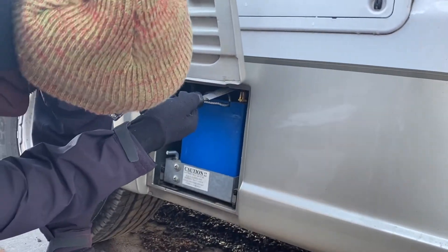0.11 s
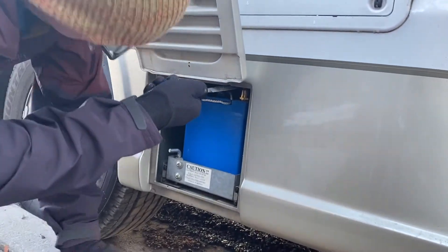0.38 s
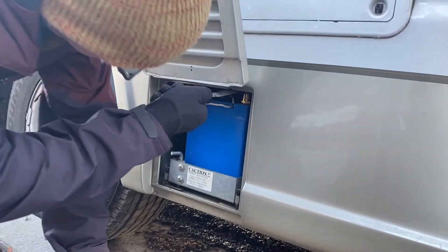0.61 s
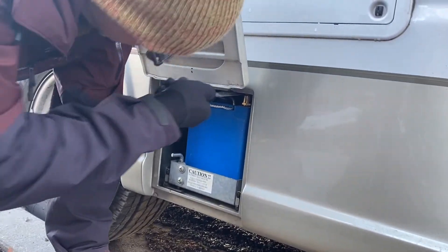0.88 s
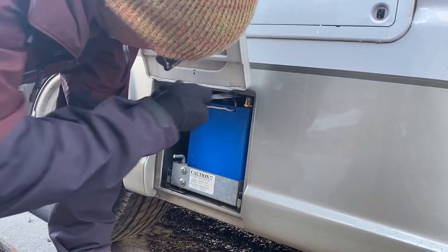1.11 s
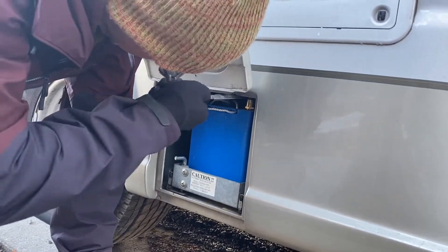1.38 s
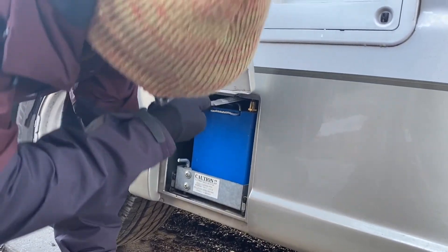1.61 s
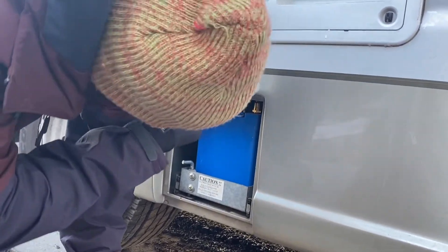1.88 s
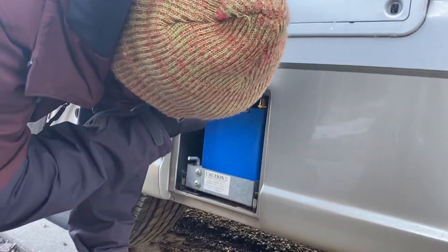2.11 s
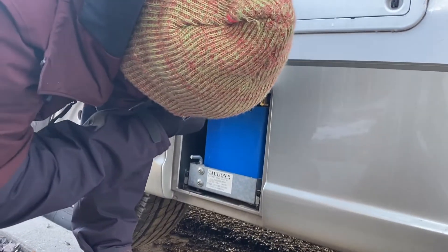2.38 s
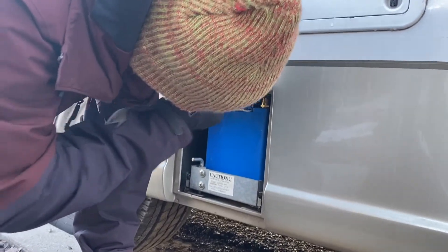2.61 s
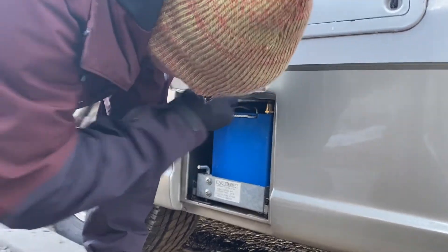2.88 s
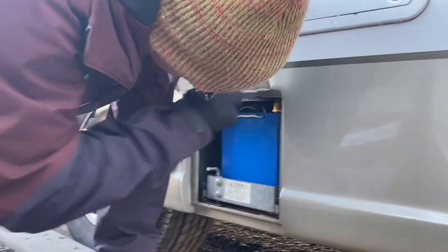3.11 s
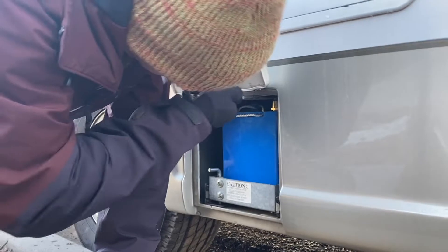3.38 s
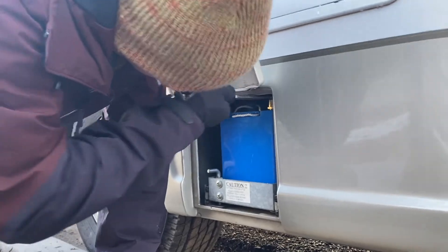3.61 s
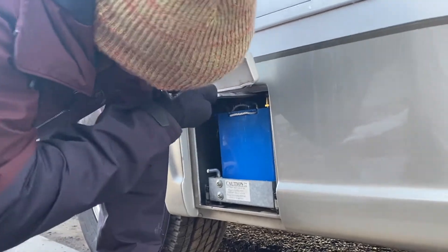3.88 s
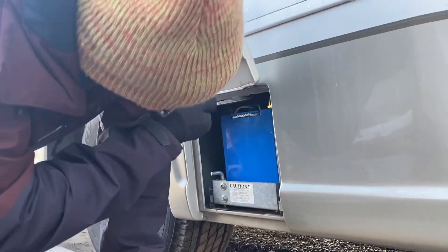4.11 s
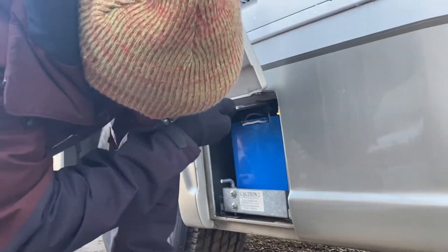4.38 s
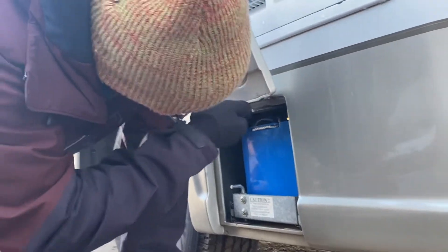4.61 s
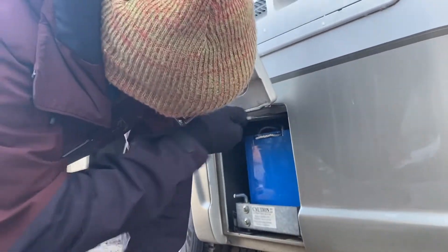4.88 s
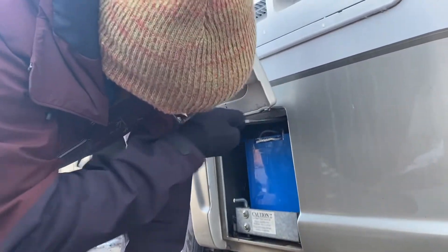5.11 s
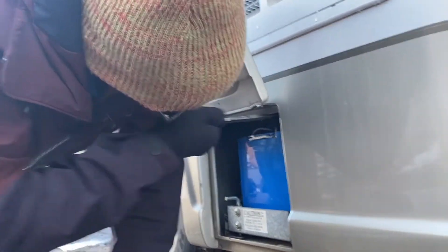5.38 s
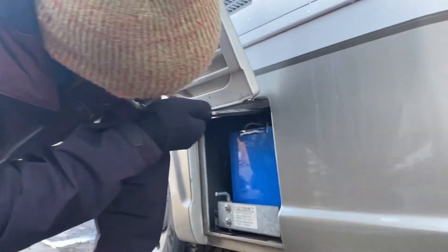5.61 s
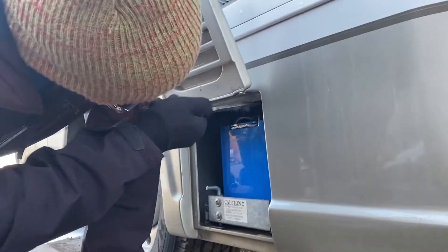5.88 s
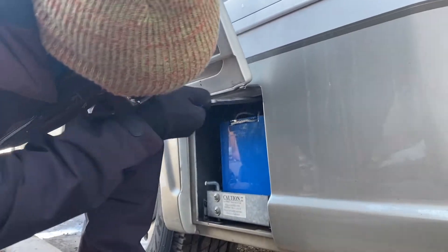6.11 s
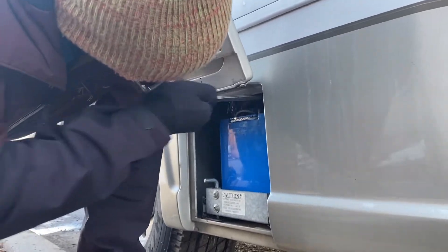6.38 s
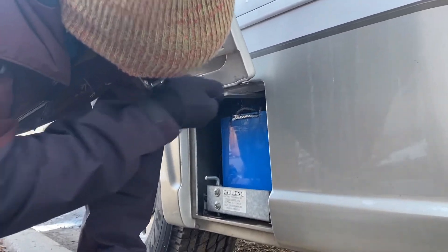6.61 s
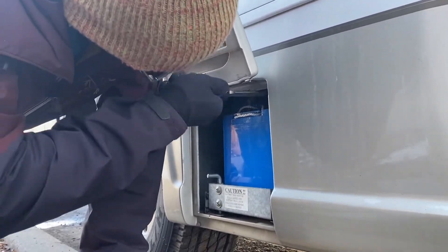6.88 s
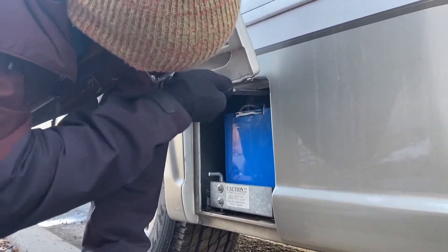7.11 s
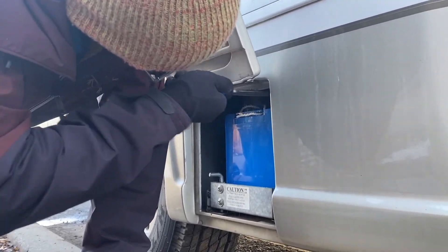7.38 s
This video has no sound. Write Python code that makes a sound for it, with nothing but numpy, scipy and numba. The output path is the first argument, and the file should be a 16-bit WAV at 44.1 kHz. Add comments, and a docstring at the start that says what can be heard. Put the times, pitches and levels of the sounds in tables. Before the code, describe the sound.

A hand file scrapes rapidly on a thin sheet-metal opening, close to a stereo handheld microphone in open air. Bright gritty hiss alternates between stronger and lighter strokes, over a hollow, rattling panel and low thumps. After a brief first run and a quieter gap, three steady runs follow, separated by short rests, while faint traffic and hum lie far behind.

```python
"""A hand file works a sheet-metal edge inside a vehicle's side compartment, outdoors, over traffic and hum.
Light touches lead into a first run of strokes: tooth clicks hiss and ring the file, coarser catches rattle
the thin panel's resonances, and gliding sines boom beneath. In the pause from 1.3 s come a few knocks, a
thin whistle of narrow noise near 2.1 s and a swell of band-limited tyre roar, which stays on at a lower level.
Filing returns at 2.4 s in three runs, parted by light strokes at 3.8 s and 5.5 s, with bursts as knocks."""
import sys
import numpy as np
from scipy import signal
from scipy.fft import rfft, irfft, next_fast_len
from scipy.io import wavfile
from numba import njit

SR = 44100
rng = np.random.default_rng(int(sys.argv[2]) if len(sys.argv) > 2 else 0)


def decibels_to_gain(level_db):
    """Convert a level in decibels to a linear amplitude gain (20 dB per decade)."""
    exponent = np.asarray(level_db, float) / 20
    return 10 ** exponent


def dump_mix(stems):
    """Bounce the given channels to the path in sys.argv[1] as a 16-bit WAV at rate SR."""
    frames = np.atleast_2d(stems).T  # one column per channel
    limited = np.clip(frames, -1, 1)  # hard clip at full scale
    pcm = np.round(limited * 32767).astype(np.int16)
    wavfile.write(sys.argv[1], SR, pcm)


N = 330309

# colour of the far traffic: f/Hz, relative level/dB
TRAFFIC_COLOUR = [(32, -25), (64, 5), (160, -13), (200, -14), (350, -22), (480, -26), (1550, -30),
                  (2100, -45.5), (12000, -52)]
# faint steady hum: f/Hz, level/dB
HUM_TONES = [(159, -46), (349.9, -54)]
# tyre roar of a far vehicle, end levels held: t/s, level/dB
PASSING_LEVEL = [(1.65, -69), (1.932, -69), (2.208, -54), (2.4, -60)]
# swells of the panel's lowest bending: centre t/s, level/dB before stereo balance, f/Hz at the centre
BOOM_SWELLS = [(0.6, -12.5, 160), (0.718, -18.5, 175.4), (0.861, -4.5, 165.6), (1.146, -6.5, 157.7),
               (1.576, -21.5, 159), (2.641, -4, 148.4), (2.762, -11.5, 177.3), (4.103, -13.5, 144),
               (4.292, -10, 138), (4.663, -10.5, 141), (5.357, -8, 146), (5.894, -10, 141),
               (6.045, -4, 184), (6.623, -7, 177.4), (6.85, -7.5, 179), (7.034, -4.5, 183),
               (7.075, -8, 180), (7.307, 1.5, 174)]
# file strokes, push and pull in turn:
# start t/s, length t/s, relative rasp level/dB, relative panel level/dB, hardest bite/share of stroke 0-1
FILE_STROKES = [(0.037, 0.046, -37, -34, 0), (0.143, 0.074, -35.5, -37, 0), (0.22, 0.77, -46.5, -57, 0),
                (0.543, 0.076, -33, -28.5, 0.2), (0.683, 0.079, -33.5, -18.5, 0.9),
                (0.809, 0.07, -13, -11.5, 0.83), (0.934, 0.1, -18, -13, 0.3),
                (1.056, 0.097, -13.5, -10.5, 0.7), (1.165, 0.11, -26, -12.5, 0.1),
                (1.279, 0.021, -21.5, -20.5, 0.3), (2.455, 0.042, -32, -28, 0.05),
                (2.548, 0.13, -19.5, -15.5, 0.7), (2.695, 0.09, -28.5, -11, 0.24),
                (2.806, 0.07, -16, -9.5, 0.53), (2.905, 0.11, -29.5, -14, 1),
                (3.028, 0.11, -19.5, -16, 0.34), (3.151, 0.091, -23, -11.5, 0.18),
                (3.258, 0.1, -14.5, -12.5, 0.85), (3.37, 0.11, -24.5, -13, 0.54),
                (3.493, 0.092, -14, -11.5, 0.74), (3.606, 0.097, -20, -14.5, 0.6),
                (3.728, 0.025, -21.5, -12.5, 0.4), (3.839, 0.16, -39, -41, 0),
                (4.057, 0.1, -31.5, -18.5, 1), (4.237, 0.075, -19.5, -12, 0.55),
                (4.32, 0.13, -37, -22, 0.2), (4.463, 0.11, -11, -14, 0.4), (4.581, 0.099, -19.5, -9.5, 0.8),
                (4.706, 0.12, -8, -12, 0.3), (4.833, 0.093, -22.5, -9.5, 0.47),
                (4.943, 0.091, -11.5, -13.5, 0.67), (5.051, 0.1, -22, -14, 0.67),
                (5.17, 0.11, -12, -11.5, 0.18), (5.285, 0.11, -20, -8, 0), (5.536, 0.12, -40, -40, 0),
                (5.851, 0.099, -13.5, -14.5, 0.9), (5.966, 0.11, -26, -13, 0.3),
                (6.09, 0.097, -10, -11, 0.17), (6.206, 0.098, -25.5, -11.5, 0.16),
                (6.323, 0.093, -16, -12, 0.38), (6.433, 0.088, -27.5, -13, 0.15),
                (6.537, 0.11, -15.5, -16.5, 0.46), (6.657, 0.087, -28, -10.5, 0.06),
                (6.766, 0.094, -16, -13.5, 0.3), (6.883, 0.081, -26, -9.5, 0.86),
                (6.992, 0.099, -14, -11.5, 0.64), (7.119, 0.093, -28, -8, 0.2),
                (7.236, 0.1, -16.5, -9.5, 0.84), (7.359, 0.085, -27, -8, 0.6),
                (7.47, 0.043, -27.5, -20.5, 0.37)]
# the file knocks on the edge: t/s, relative burst level/dB, treble relative to it level/dB
EDGE_KNOCKS = [(0.041, -27.5, -0.5), (0.068, -39, 7), (0.156, -36, 5), (0.182, -40, -18), (0.205, -28, 1),
               (0.283, -40, 6), (0.544, -27, 8.5), (0.594, -26.5, 9), (0.757, -15.5, 1.5),
               (0.879, -3.5, -38), (1.448, -21.5, -29), (1.56, -29, -18), (2.053, -48, -5),
               (2.443, -19.5, -33), (2.865, -3.5, -34), (3.686, -5, -14), (4.057, -9, -53),
               (4.205, -43, 10), (4.243, -17, 10.5), (4.265, -6.5, -27), (4.353, -16.5, -23),
               (4.946, -18, 13.5), (5.172, -18, 1), (5.411, -9.5, -24), (5.754, -9, -62),
               (5.877, -12.5, 10.5), (6.104, -12.5, 9), (6.168, -7, -9), (6.335, -20, 14.5),
               (6.549, -12, 6.5), (7.003, -16, 9.5), (7.161, -6, -32), (7.395, -5, -37)]
# panel resonances: f/Hz, relative level/dB
PANEL_MODES = [(140, 7), (175, 8.5), (250, -1), (345, 2), (520, -5), (640, -4.5), (735, -6.5), (975, -14.5),
               (1150, -14), (1400, -21), (1650, -24), (1930, -24.5), (2300, -25.5), (2900, -37)]
# file and edge resonances: f/Hz, relative level/dB
FILE_MODES = [(1830, -8), (3000, 1), (3530, -9), (4270, 2), (4500, -5)]
# colour of the tooth hiss: f/Hz, relative level/dB
RASP_COLOUR = [(1500, -3), (7400, -4), (8600, -6.5), (10500, -6), (12500, -4.5), (13300, -10), (15200, -16),
               (16300, -43)]


def rms_one(x):
    """Scale to rms 1."""
    return x / np.sqrt(np.mean(x ** 2) + 1e-20)


def coloured(x, spectrum):
    """Give x a spectrum of (Hz, dB) points, joined along log frequency; rms 1."""
    size = next_fast_len(N)
    hz, db = np.transpose(spectrum)
    log_hz = np.log(np.fft.rfftfreq(size, 1 / SR) + 1)
    gain = decibels_to_gain(np.interp(log_hz, np.log(hz), db))
    return rms_one(irfft(rfft(x, size) * gain, size)[..., :N])


def drift(rate_hz):
    """Slow chance of rms 1: noise through two equal one-pole low-passes."""
    r = np.exp(-2 * np.pi * rate_hz / SR)
    slow = signal.lfilter([1], [1, -2 * r, r * r], rng.standard_normal(N + SR))
    return rms_one(slow[SR:])  # the filter has settled by now


@njit
def moving(x, turn, r):
    """One resonance of pole radius r whose centre (radians per sample) moves."""
    out = np.zeros_like(x)
    for i in range(2, x.shape[1]):
        pull = 2 * r * np.cos(turn[i])
        for c in range(x.shape[0]):
            push = (1 - r * r) / 2 * (x[c, i] - x[c, i - 2])
            out[c, i] = push + pull * out[c, i - 1] - r * r * out[c, i - 2]
    return out


def resonate(x, modes, width_hz, widen, shift_db, wander):
    """Parallel resonances, wider upwards; strength and pitch shift as the contact point travels."""
    out = 0
    for k, (hz, db) in enumerate(modes):
        r = np.exp(-np.pi * (width_hz + widen * hz) / SR)
        drive = decibels_to_gain(db + shift_db * drift(5.5)) * x + 1e-18
        turn = 2 * np.pi * hz / SR * (1 + wander * drift(1.79))
        left, right = moving(drive, turn, r)
        # each mode reaches the two microphones with a lag of its own, in samples
        lag = round(rng.uniform(-1, 1) * min(SR / hz / 6, 5))
        out = out + (-1) ** k * np.array([left, np.roll(right, lag)])
    return out


def outdoors():
    """Far traffic as coloured noise, alike at both microphones only in the bass, and a faint steady hum."""
    traffic = coloured(rng.standard_normal((2, N)), TRAFFIC_COLOUR)
    mid, side = traffic * decibels_to_gain(1.5 * drift(1))
    side = signal.sosfilt(signal.butter(2, 250, "high", fs=SR, output="sos"), side)
    t = np.arange(N) / SR
    hum = sum(np.sqrt(2) * decibels_to_gain(db) * np.sin(2 * np.pi * hz * t) for hz, db in HUM_TONES)
    return decibels_to_gain(-34) * np.array([mid + 1.27 * side, mid - 0.94 * side]) + hum


def passing():
    """Tyre roar, a band of noise, swells, then recedes part of the way and holds."""
    s, db = np.transpose(PASSING_LEVEL)
    level = decibels_to_gain(np.interp(np.arange(N) / SR, s, db))
    band = signal.butter(2, (1120, 1850), "band", fs=SR, output="sos")
    roar = signal.sosfilt(band, rng.standard_normal((2, N)))
    return level * rms_one(roar + 0.7 * roar[::-1])  # partly shared left and right


def whistle():
    """Noise through two equal narrow resonances: a thin breathy line rises out of the background and fades."""
    centre_s, half_s, pitch_hz, width_hz, level_db = 2.06, 0.09, 3350, 90, -67
    r = np.exp(-np.pi * width_hz / SR)
    turn = np.full(N, 2 * np.pi * pitch_hz / SR)
    line = moving(moving(rng.standard_normal((2, N)), turn, r), turn, r)
    away = (np.arange(N) / SR - centre_s) / half_s
    return decibels_to_gain(level_db) * np.exp(-away ** 2) * rms_one(line)


def compartment(x):
    """The open metal compartment adds a short midrange tail, another at each microphone."""
    t = np.arange(SR // 4) / SR
    fading = rng.standard_normal((2, len(t))) * decibels_to_gain(-60 * t / 0.11)  # 60 dB down in 0.11 s
    tail = signal.lfilter([1, -1], [1, -1.65, .67], fading)
    mono = x.mean(axis=0)[None]
    return x + decibels_to_gain(-39) * signal.fftconvolve(mono, tail, axes=1)[:, :N]


def booms():
    """The lowest bending swells and sags slightly in pitch, ringing out slower than it rises."""
    rise_s, fall_s, sag_per_s = 0.0072, 0.0082, 1  # pitch falls by twice the sag
    out = np.zeros(N)
    phases = rng.random((len(BOOM_SWELLS), 1))  # in cycles
    for (centre, db, hz), phase in zip(BOOM_SWELLS, phases):
        first, last = max(int((centre - .1) * SR), 0), min(int((centre + 0.084) * SR), N)
        at = np.arange(first, last)
        t = at / SR - centre
        away = np.where(t < 0, -t / rise_s, t / fall_s)
        cycles = hz * t * (1 - sag_per_s * t) + phase
        out[at] += np.sqrt(2) * decibels_to_gain(db - 4.65 * away ** 0.72) * np.sin(2 * np.pi * cycles)
    return out * decibels_to_gain(np.array([[-.6], [.6]]))  # left, right dB


def pressure(column, centre, follows, rise_db, fall_db, power):
    """Each stroke swells from the hand's reversal to its peak and sinks towards the next reversal."""
    t, total = np.arange(N) / SR, np.zeros(N)
    for row in FILE_STROKES:
        start, length, db, bite = row[0], row[1], row[column], row[4]
        # the peak lies at a usual share of the stroke, drawn partly towards the bite
        peak = np.clip(centre + follows * (bite - .5), .05, .95)
        span = slice(max(int((start - length) * SR), 0), int((start + 2 * length) * SR))
        share = (t[span] - start) / length
        away = np.where(share < peak, (peak - share) / peak, (share - peak) / (1 - peak))
        drop_db = np.where(share < peak, rise_db, fall_db) * away ** power
        total[span] += decibels_to_gain(db - drop_db) ** 2
    return np.sqrt(total)


def teeth(per_s, spread_db, width):
    """Teeth catch the edge in clumps with uneven force; a share of it differs between left and right."""
    force = decibels_to_gain(spread_db * np.minimum(rng.exponential(1, (2, N)), 5))
    sizes = force * rng.choice([-1, 1], (2, N))
    clumps = decibels_to_gain(3 * drift(60))
    caught = rng.random((2, N)) < clumps * per_s / SR
    mid, side = rms_one(sizes * caught)
    return np.array([mid + width * side, mid - width * side]) / np.sqrt(1 + width ** 2)


def knocks(soft_s, bright, click):
    """A hard first click, then a short scraping burst with a tail as the file slides a little."""
    slide_s, slide_db = 0.066, -24.5
    out, t = np.zeros(N), np.arange(4000) / SR
    fade = np.exp(-t / soft_s) + decibels_to_gain(slide_db) * np.exp(-t / slide_s)
    for s, db, bright_db in EDGE_KNOCKS:
        burst = fade * rng.standard_normal(len(t))
        burst[0] = click
        start = int(s * SR)
        out[start:start + len(t)] += decibels_to_gain(db + bright * bright_db) * burst
    return out


def panel():
    """Coarser catches and the knocks shake the sheet, whose resonances ring on."""
    force = pressure(column=3, centre=0.55, follows=0.23, rise_db=13.5, fall_db=17, power=3.2)
    force = force * decibels_to_gain(1.5 * drift(40))
    # a knock is short and stiff: it shakes the upper resonances most
    low_cut = signal.butter(1, 270, "high", fs=SR, output="sos")
    stiff = signal.sosfilt(low_cut, knocks(soft_s=0.0088, bright=0, click=6.2))
    drive = force * teeth(per_s=1800, spread_db=1.5, width=0.056) + decibels_to_gain(4) * stiff
    ring = resonate(drive, PANEL_MODES, width_hz=1.5, widen=0.091, shift_db=2.2, wander=.035)
    # the dull clunk heard straight from the contact
    clunk = signal.sosfilt(signal.butter(1, 795, fs=SR, output="sos"), stiff)
    return (decibels_to_gain(19.5) * ring + decibels_to_gain(-5.5) * clunk) * decibels_to_gain(np.array([[-.8], [.8]]))  # left, right dB


def spread(pair, lag_s, above_hz):
    """The recorder's body delays the top treble on its way to the left microphone."""
    size = next_fast_len(N)
    late = np.maximum(np.fft.rfftfreq(size, 1 / SR) - above_hz, 0) * lag_s  # in cycles
    left = irfft(rfft(pair[0], size) * np.exp(-2j * np.pi * late), size)[:N]
    return np.array([left, pair[1]])


def rasp():
    """Dense tooth clicks hiss and ring the file; the grip makes the level chatter."""
    force = pressure(column=2, centre=0.46, follows=0.54, rise_db=17, fall_db=23, power=2.73)
    force = force * decibels_to_gain(0.35 * drift(39))
    clicks = teeth(per_s=3000, spread_db=3.8, width=.18)
    drive = force * clicks + knocks(soft_s=0.0052, bright=0.91, click=1.4)
    hiss = coloured(drive, RASP_COLOUR) * np.std(drive)
    # the shaking panel also rings the file, best heard on the light pulls
    shake = pressure(column=3, centre=0.54, follows=1, rise_db=10, fall_db=18.5, power=4.7)
    struck = hiss + decibels_to_gain(-19.5) * shake * clicks
    ring = resonate(struck, FILE_MODES, width_hz=80, widen=0.012, shift_db=2.5, wander=.02)
    return spread(0.55 * hiss + decibels_to_gain(1.5) * ring, lag_s=.0002, above_hz=5650)


def scene():
    """Surroundings, booms, and the panel and file heard within the compartment."""
    surroundings = outdoors() + passing() + whistle()
    return surroundings + booms() + compartment(panel() + rasp())


def band_limit(x):
    """A steep low-pass at the top of the band."""
    return signal.sosfilt(signal.butter(12, 16400, fs=SR, output="sos"), x)


def record(dry):
    """The loudest peaks hit a hard-kneed ceiling at full scale."""
    knee = 10  # higher is harder
    mix = dry / (1 + np.abs(dry) ** knee) ** (1 / knee)
    return band_limit(mix)


dry = scene()
out = record(dry)
dump_mix(out)
```